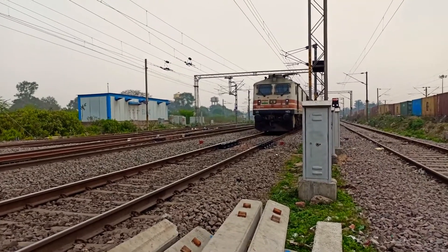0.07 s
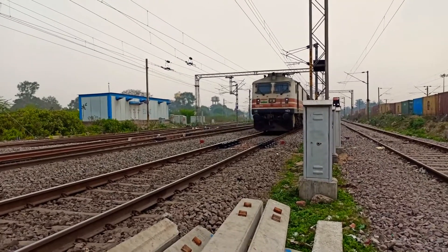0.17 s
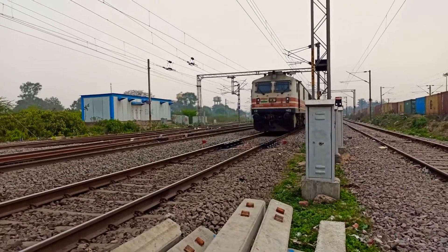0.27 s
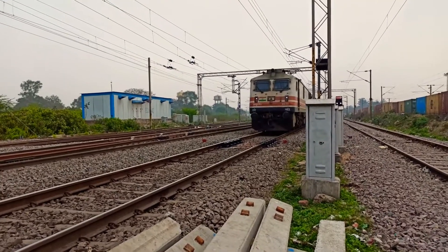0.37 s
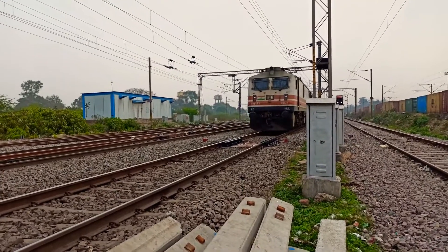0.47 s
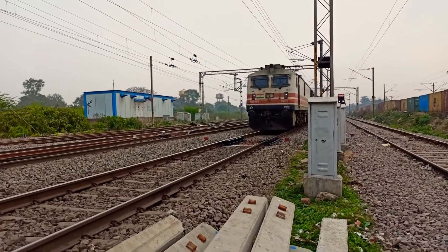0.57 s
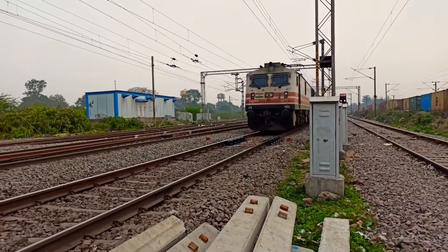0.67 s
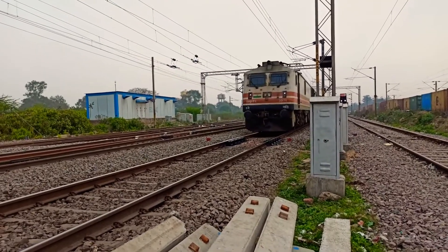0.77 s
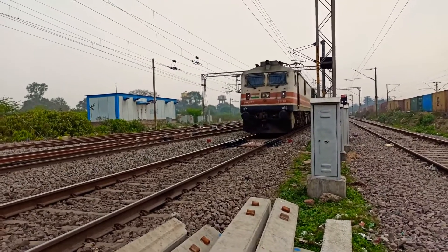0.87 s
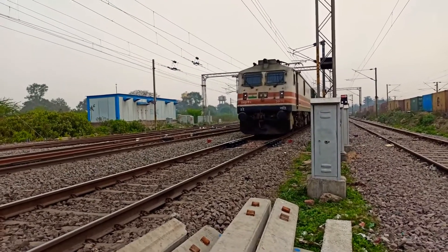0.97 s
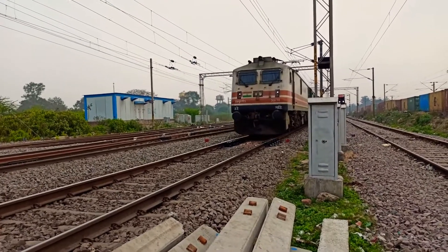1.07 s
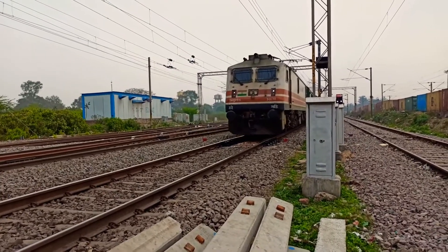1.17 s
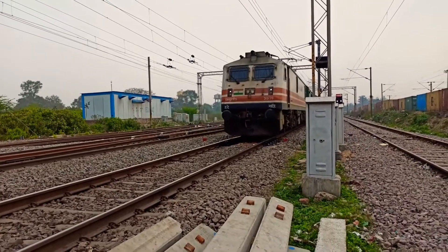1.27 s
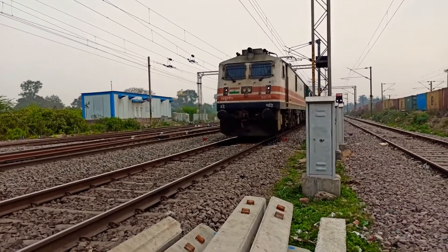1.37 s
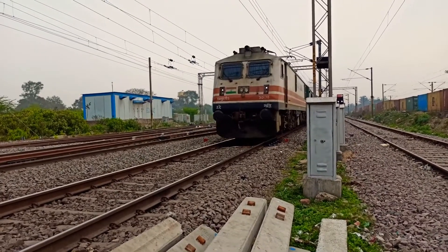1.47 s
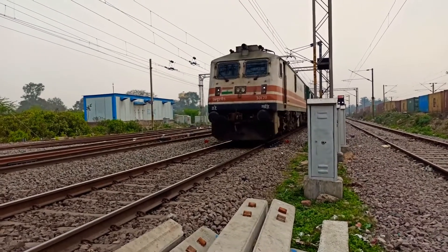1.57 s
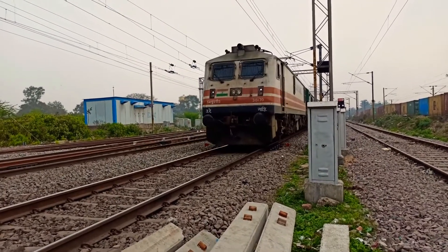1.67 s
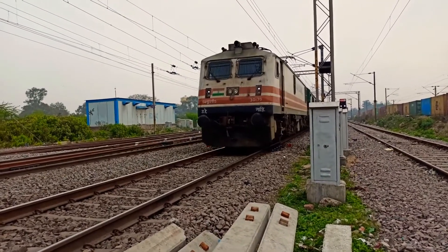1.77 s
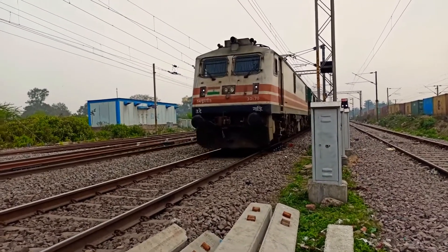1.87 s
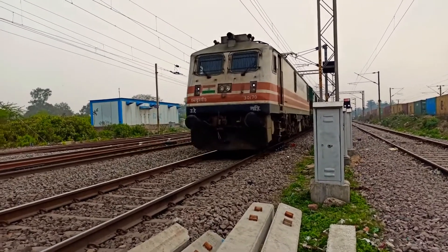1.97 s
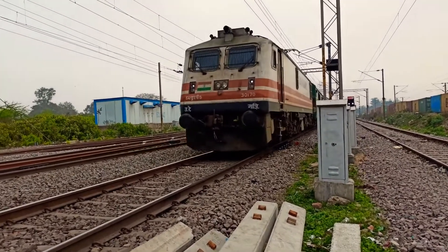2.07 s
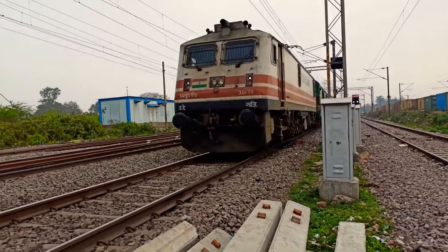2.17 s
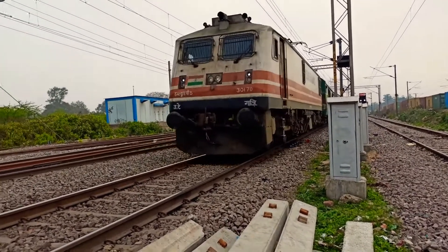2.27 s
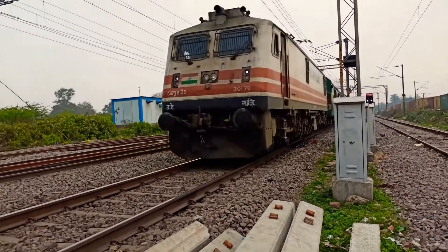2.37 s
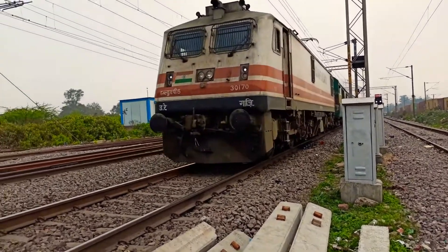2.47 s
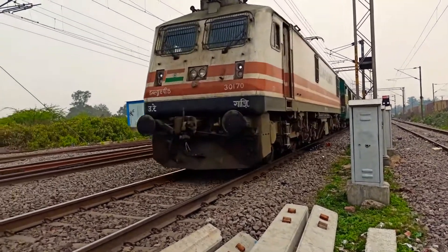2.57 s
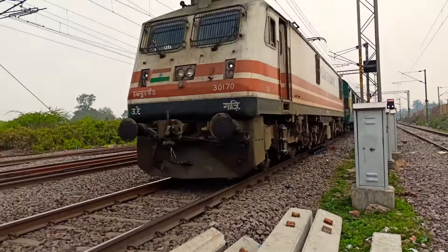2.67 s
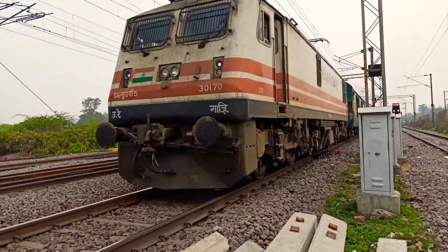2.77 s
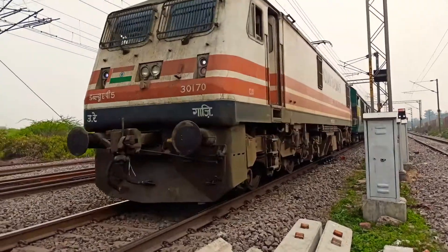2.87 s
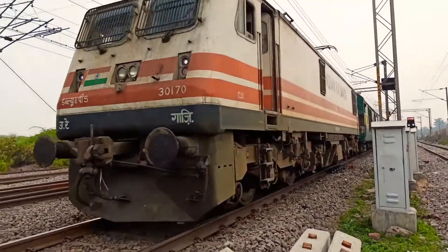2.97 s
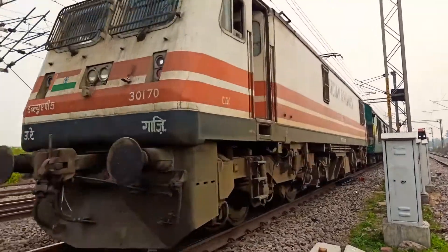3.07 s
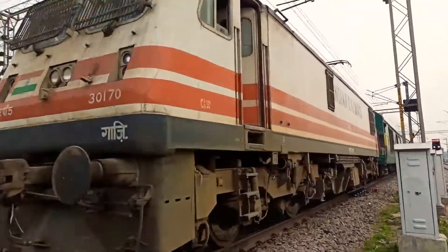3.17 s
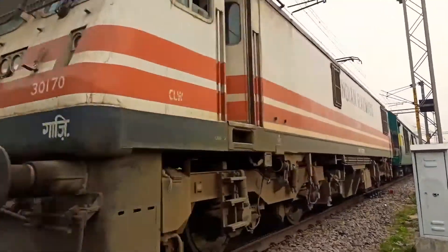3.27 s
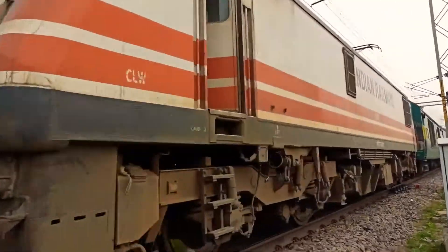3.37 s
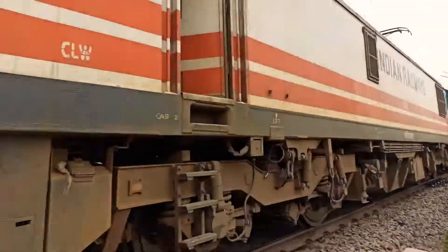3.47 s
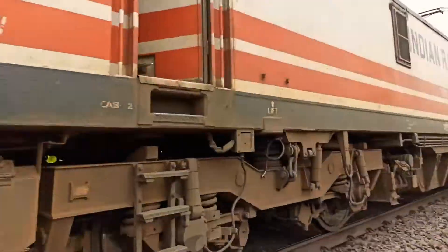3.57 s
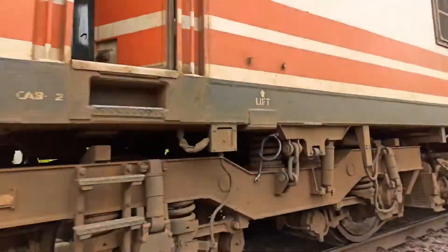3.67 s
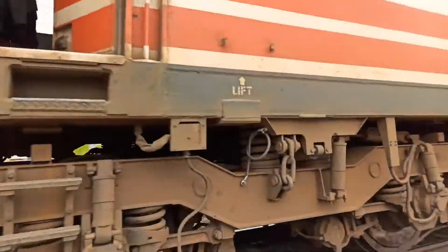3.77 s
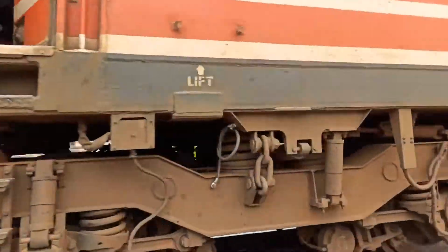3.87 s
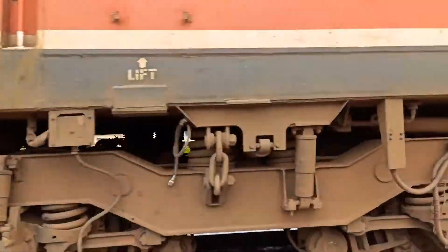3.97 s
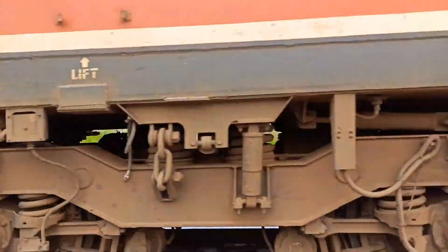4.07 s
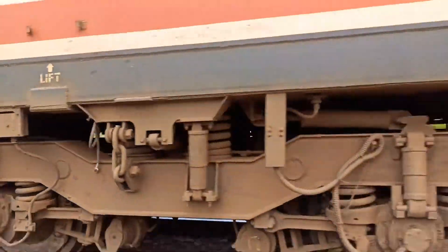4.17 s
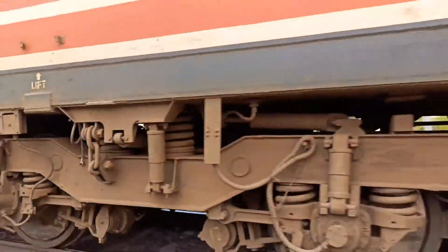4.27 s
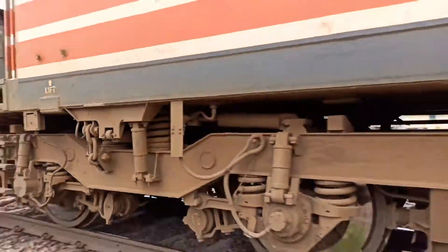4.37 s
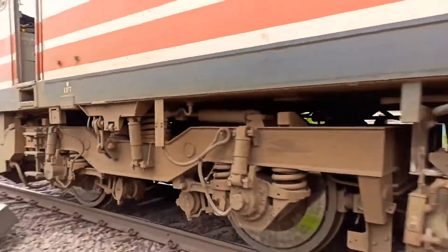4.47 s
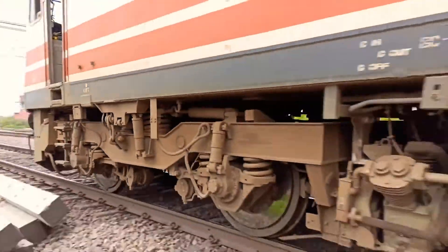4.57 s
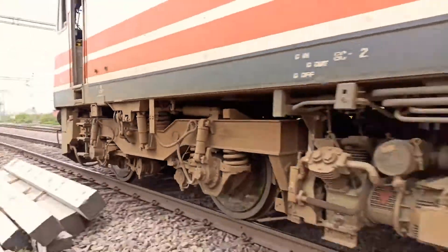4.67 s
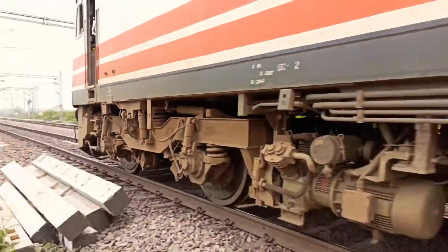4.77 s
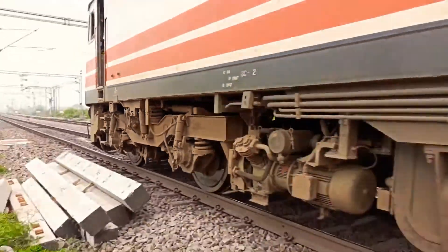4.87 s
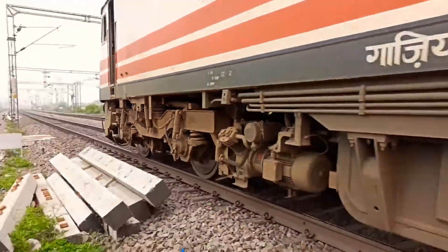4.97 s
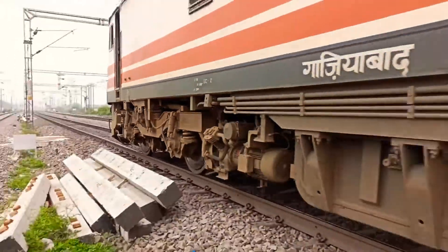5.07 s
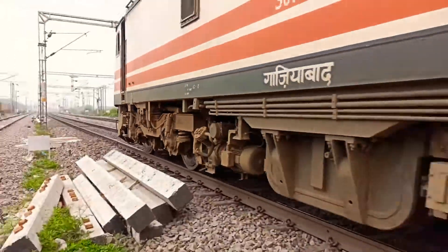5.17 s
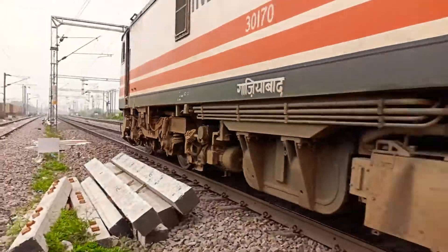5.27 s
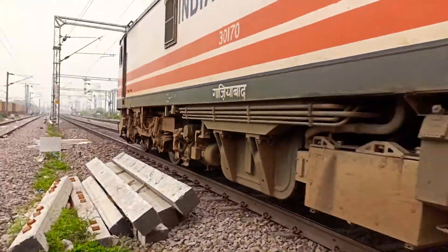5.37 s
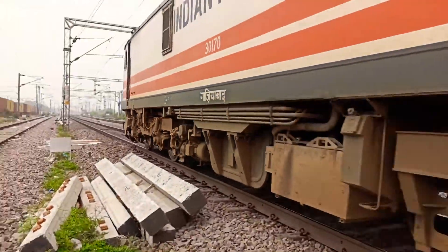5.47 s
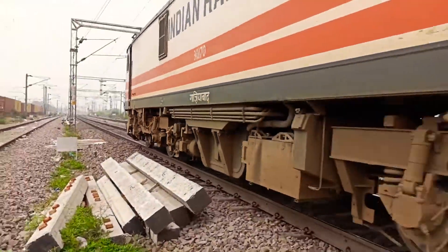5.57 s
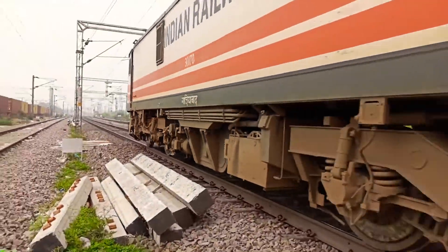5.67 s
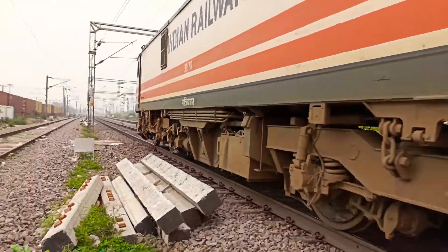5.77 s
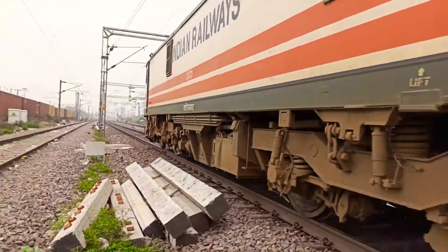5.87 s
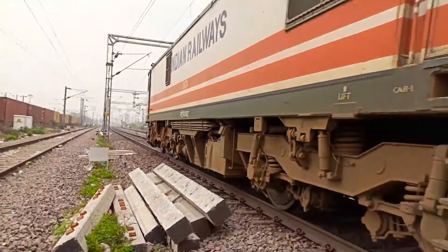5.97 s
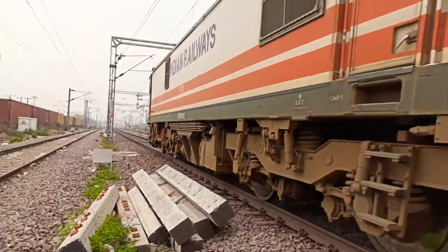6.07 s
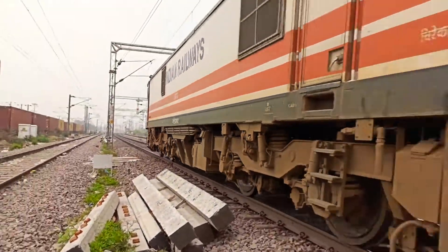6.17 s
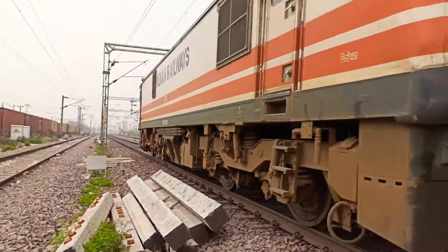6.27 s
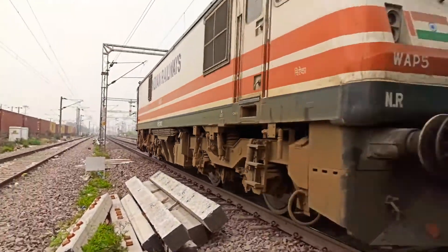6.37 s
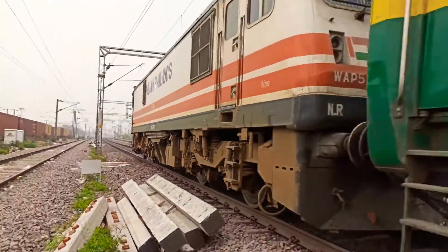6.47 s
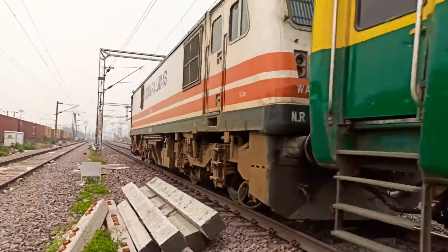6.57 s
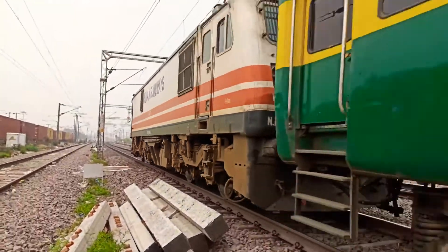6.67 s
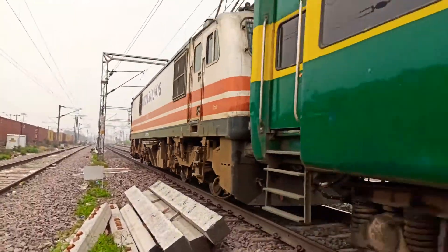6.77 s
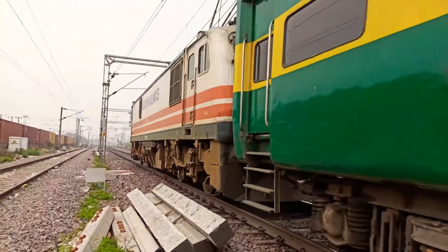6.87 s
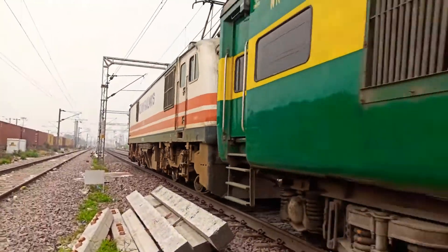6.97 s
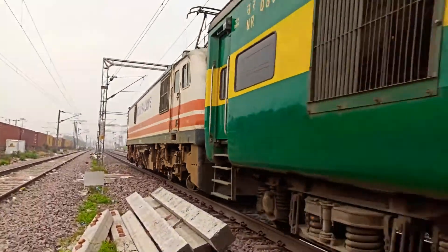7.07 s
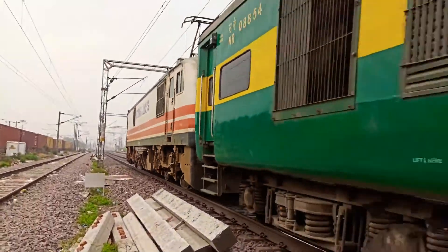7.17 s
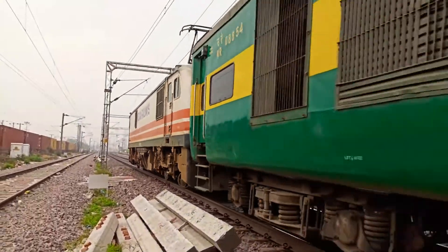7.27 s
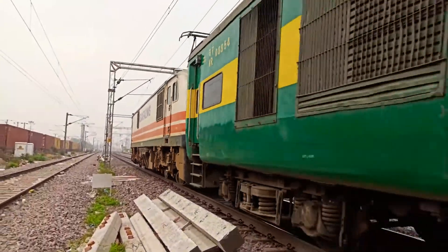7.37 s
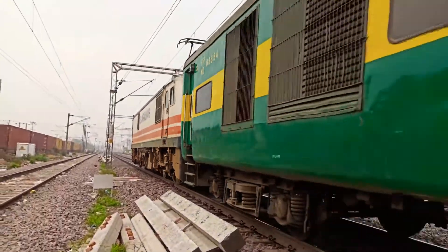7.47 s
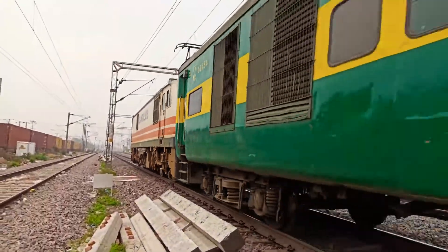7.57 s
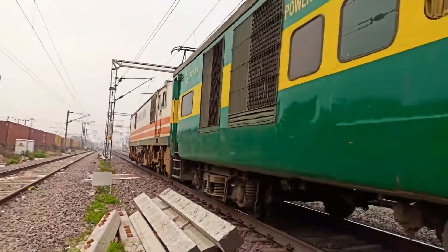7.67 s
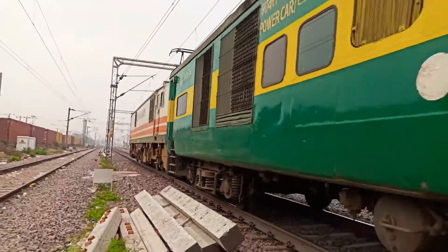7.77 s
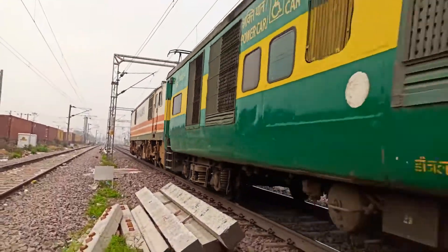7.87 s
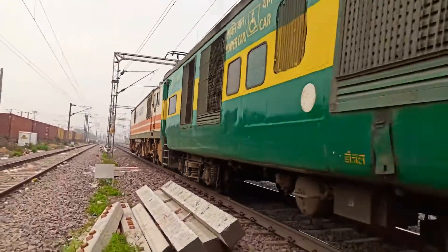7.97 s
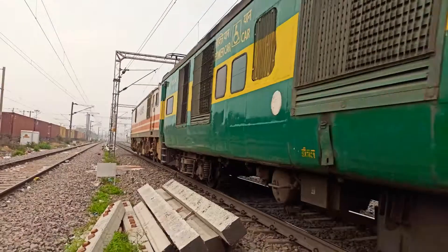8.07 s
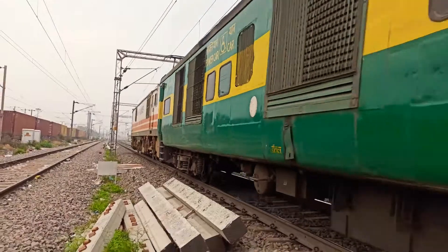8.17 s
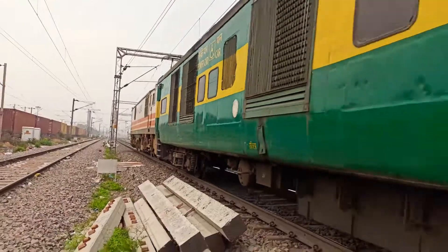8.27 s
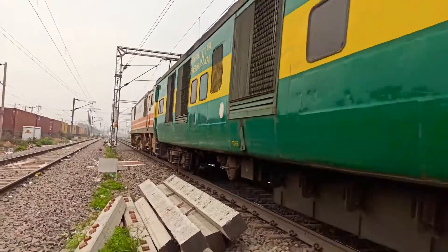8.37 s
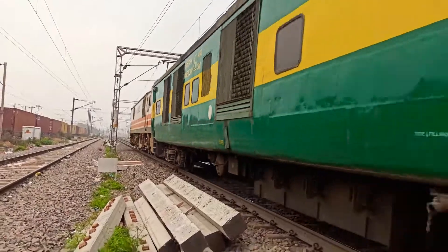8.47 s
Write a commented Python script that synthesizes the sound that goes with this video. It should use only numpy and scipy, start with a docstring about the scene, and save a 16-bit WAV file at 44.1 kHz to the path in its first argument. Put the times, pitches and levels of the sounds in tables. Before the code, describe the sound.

Rough, patchy wheel-on-rail noise grows from moderate to heavy as a train draws level a few metres away in the open. Under it a deep electric hum wavers. Wheel rims shriek in wandering high tones and flanges scrape in hissing bursts, loudest just after a quick cluster of metallic clanks. Loud treble briefly pushes the rest down; later, rumble and hum dominate.

```python
"""An electric locomotive and its first coach roll slowly past, a few metres from a pair of microphones.
From the start noise rumbles and roars like wheels on rail, under wavering motor hums; wheel rims squeal as
wandering tones and flanges scrape in bursts of hiss. Around two seconds axles knock over a joint, as
noise-struck damped modes; then come the loudest squeals and scrapes, and the motors whine more, as unsteady
tones. The last scrapes and squeals are weaker. Gain control ducks everything under loud treble throughout."""
import sys
import numpy as np
from scipy import signal
from scipy.fft import next_fast_len
from scipy.io import wavfile
from scipy.ndimage import uniform_filter1d

SR = 44100
rng = np.random.default_rng(int(sys.argv[2]) if len(sys.argv) > 2 else 0)


def how_loud(loudness_db):
    """Turn decibels into a plain amplitude multiplier (0 dB gives 1, 20 dB gives 10)."""
    steps = np.asarray(loudness_db, float) / 20
    return 10 ** steps


def wav_record(signal):
    """Record a signal, one row per channel, as 16-bit PCM in the file named by sys.argv[1]."""
    frames = np.transpose(np.atleast_2d(signal))
    bounded = np.clip(frames, -1, 1)
    # unit amplitude maps onto the largest positive 16-bit level
    quanta = np.round(bounded * 32767).astype(np.int16)
    wavfile.write(sys.argv[1], SR, quanta)


N = 375732  # length in samples

# likeness of left and right, from 0 to 1: f/Hz, likeness
LIKENESS = [(60, .8), (300, .9), (800, .65), (1500, .45), (4000, .4), (15000, .1)]
# the side of the sound shifts back and forth between the microphones: t/s, lag of left behind right/ms
LEFT_LAG = [(0, 0.19), (1.4, 0.26), (1.8, -0.234), (2.8, -0.32), (3.3, 0.22), (6.5, 0.376), (7.4, 0.093),
            (8.52, -0.049)]
# the train draws near, then bogies pass: t/s, rumble level at 250-1000 Hz/dB, roar level at 1400-3600 Hz/dB
ROLLING_LEVELS = [(0, -28, -36.5), (.8, -27.5, -36.5), (1.3, -23.5, -32.5), (1.9, -23, -33),
                  (3.1, -23, -34.5), (3.25, -15.5, -27), (3.37, -19, -31.5), (3.44, -20.5, -31.5),
                  (4, -17.5, -25), (4.45, -17.5, -29), (5.2, -16, -27.5), (6.3, -16, -29.5),
                  (6.8, -13, -26.5), (7.34, -17, -28.5), (8.5, -16.5, -29)]


def read(points, hz):
    """Value of a spectrum at the given frequencies, joined along log frequency."""
    f, value = np.transpose(points)
    return np.interp(np.log(hz + 1), np.log(f + 1), value)


def follow(rows, t=None):
    """Every column of a curve, at the times t or else one value a sample."""
    s, *columns = np.transpose(rows)
    if t is None:
        t = np.arange(N) / SR
    return [np.interp(t, s, column) for column in columns]


def evened(x):
    """Scales to rms 1."""
    return x / np.sqrt(np.mean(abs(x) ** 2))


def wide_noise(spectrum, band_hz, patchy_db, flicker_db, size=12):
    """Stereo noise with drifting patches and flicker; the mean of both sides has rms 1 in band_hz."""
    frames, hz = N // 256 + 5, np.fft.rfftfreq(1024, 1 / SR)[:, None]
    a, b, c, d, patches = rng.standard_normal((frames, 513, 5), np.float32).T
    patches = uniform_filter1d(patches, size=10, axis=0)  # smooth along frequency
    patches = evened(uniform_filter1d(patches, size=size, axis=1))  # and along time
    flicker = evened(uniform_filter1d(rng.standard_normal(frames), size=3))

    lag_s = follow(LEFT_LAG, np.arange(frames) * 256 / SR)[0] / 1000
    same = np.clip(read(LIKENESS, hz), 0, 1)
    right = a + 1j * b
    shared = same * right * np.exp(-2j * np.pi * hz * lag_s)
    left = shared + np.sqrt(1 - same ** 2) * (c + 1j * d)
    z = np.array([left, right]) * how_loud(read(spectrum, hz) + patchy_db * patches + flicker_db * flicker)
    x = signal.istft(z.astype(np.complex64), nperseg=1024, noverlap=768)[1][:, :N]

    power = abs(z.mean(0)) ** 2
    in_band = (hz[:, 0] > band_hz[0]) & (hz[:, 0] < band_hz[1])
    share = power[in_band].sum() / power.sum()
    return x / np.sqrt(np.mean(x.mean(0) ** 2) * share)


def whistle(t, hz, width, steady, skirt=1):
    """A complex tone wandering in size and phase within width (Hz); steady adds a clean core, low skirt a halo."""
    step = 32  # samples between points of the slow wander
    size = next_fast_len(len(hz) // step + 2)
    a, b, c, d = rng.standard_normal((size, 4)).T
    same = np.clip(read(LIKENESS, hz[0]), 0, 1)
    left = a + 1j * b
    right = same * left + np.sqrt(1 - same ** 2) * (c + 1j * d)
    off_hz = np.fft.fftfreq(size, step / SR)
    wander = np.fft.ifft(np.array([left, right]) / (1 + (2 * off_hz / width) ** 2) ** skirt)
    slow = np.sqrt(2) * evened(steady + evened(wander))  # the real part then has rms near 1

    lag_s = follow(LEFT_LAG, t[0] + np.arange(size) * step / SR)[0] / 1000
    slow[0] *= np.exp(-2j * np.pi * hz[0] * lag_s)
    at = np.arange(len(hz)) / step
    envelope = np.array([np.interp(at, np.arange(size), side) for side in slow])
    return envelope * np.exp(2j * np.pi * np.cumsum(hz) / SR)


def bursts(table, shift, steady, rise_s, fade_db_per_s, flutter_db, skirt):
    """Each stretch of tone rises, flutters along its slope, then dies away; the curve shift scales the pitch."""
    out = np.zeros((2, N), complex)
    tail_s = 25 / fade_db_per_s  # time to fall 25 dB
    for hz, width, stretches in table:
        for start, end, first_db, last_db in stretches:
            at = np.arange(round(start * SR), min(round((end + tail_s) * SR), N))
            t = at / SR
            db = np.interp(t, [start, end, end + tail_s], [first_db, last_db, last_db - 25])
            flutter = np.interp(t, t[::1500], rng.standard_normal(len(t[::1500])))
            level = how_loud(db + flutter_db * flutter) * np.minimum((t - start) / rise_s, 1)
            out[:, at] += level * whistle(t, hz * follow(shift, t)[0], width, steady, skirt)
    return out


def rolling():
    """Rough wheels on rail: low rumble and middle roar, both patchy, flickering noise."""
    # colour of the rumble: f/Hz, relative density per Hz/dB
    rumble_colour = [(30, -53), (55, -50), (100, -8.5), (170, -2.5), (350, -4), (600, -8), (950, -11.5),
                     (1150, -40), (2500, -57.5)]
    # colour of the roar: f/Hz, relative density per Hz/dB
    roar_colour = [(600, -35.5), (1100, 5), (1700, 0.5), (4000, -1.5), (4700, -5.5), (5000, -13),
                   (8500, -15), (15500, -71)]
    rumble_db, roar_db = follow(ROLLING_LEVELS)
    rumble = wide_noise(rumble_colour, (250, 1000), patchy_db=1.5, flicker_db=1.0, size=4)
    roar = wide_noise(roar_colour, (1400, 3600), patchy_db=1.5, flicker_db=0.55)
    return how_loud(rumble_db) * rumble + how_loud(roar_db) * roar


def motors():
    """Two motors about 1 Hz apart beat in a low hum with its octave; motors and gears whine unsteadily."""
    # levels of the first motor: t/s, hum level/dB, octave level/dB
    hum_levels = [(0, -23, -30.5), (.8, -26, -29.5), (1.8, -27, -28.5), (2.6, -26, -37.5),
                  (3.6, -28.5, -25.5), (4.6, -21.5, -28), (5.9, -26.5, -29), (7, -23, -20.5),
                  (8.5, -23.5, -27)]
    # pitch of the hum: t/s, f/Hz
    hum_pitch = [(0, 76.5), (2, 77.6), (6.4, 78.3), (7.3, 75.3), (8.52, 74.1)]
    # moments at which the two hums cancel most: t/s
    beats = [-.75, .24, 1.28, 2.25, 3.1, 4.2, 5.5, 6.48, 7.6, 8.3, 9.1]
    # motor and gear whines: f before the speed factor/Hz, width/Hz,
    # stretches as (start t/s, end t/s, first level/dB, last level/dB)
    whine_tones = [ (206.5, 4.7, [(3, 3.35, -20.5, -33.5), (5.7, 8.52, -17.5, -23)]),
                   (223.9, 9.8, [(3.5, 4.15, -15.5, -28.5), (4.15, 5.9, -16, -21.5)]),
                   (274, 7.3, [(2.9, 4.7, -21.5, -24)]), (328.8, 45, [(.3, 1.9, -33.5, -28),
                   (6.4, 8.3, -20.5, -22)]), (607, 14, [(2.4, 3.4, -31.5, -32.5), (3.65, 4.2, -23, -21.5),
                   (4.3, 5.5, -30, -27)]), (1209, 17, [(1.93, 3.37, -33.5, -28.5),
                   (3.5, 4.35, -25.5, -23.5), (4.4, 4.75, -30, -26)]),
                   (2010, 40, [(3.65, 4.13, -25, -20.5)]), ]
    # motor speed as heard, sinking while the motors pass: t/s, factor on the whines
    motor_speed = [(3.2, 1.012), (4.8, .983), (8.52, .955)]

    t = np.arange(N) / SR
    hum_db, octave_db = follow(hum_levels)
    apart = np.exp(2j * np.pi * np.interp(t, beats, np.arange(len(beats))))  # one turn a beat
    tone = whistle(t, follow(hum_pitch)[0], 6.9, steady=4.6)
    hum = how_loud(hum_db) * (1 - 0.7 * apart) * tone  # the second motor is 0.7 of the first
    octave = how_loud(octave_db) * (1 - 0.15 * apart ** 2) * tone ** 2 / np.sqrt(2)
    whines = bursts(whine_tones, motor_speed, steady=1.2, rise_s=0.047, fade_db_per_s=150,
                    flutter_db=2.0, skirt=1)
    return (hum + octave + whines).real


def knocks():
    """Each axle clanks the joint: a dying rattle of noise rings damped steel, with a low thud."""
    # wheels over the joint: t/s, clank peak level/dB, thud peak level/dB
    axles = [(1.7193, -3, -9.5), (1.847, -3.5, -17), (1.8956, -2, -24), (2.015, -7, -26),
             (2.1287, -3.5, -4.5)]
    # modes of the struck steel: f/Hz, relative level/dB, time to fall 60 dB/s
    steel_modes = [(836, -2, 0.021), (2150, -17, 0.019), (4150, -2, 0.0047), (6410, -1, 0.011),
                   (7300, -15, 0.0083)]
    t, out = np.arange(4000) / SR, np.zeros((2, N))
    low = signal.butter(N=2, Wn=1100, fs=SR)
    for s, clank_db, thud_db in axles:
        balance_db = rng.uniform(-4, 4, len(steel_modes))  # each axle rings the modes in its own balance
        steel = np.zeros(len(t))
        for (hz, db, t60), extra_db in zip(steel_modes, balance_db):
            steel += how_loud(db + extra_db - 60 * t / t60) * np.sin(2 * np.pi * hz * t)
        steel[0] = 3.0  # the bare crack
        rattle = rng.standard_normal((2, len(t))) * how_loud(-60 * t / .05) * np.minimum(t / .002, 1)
        clank = signal.fftconvolve(rattle, steel[None], axes=1)[:, :len(t)]
        thud = signal.lfilter(*low, rng.standard_normal(len(t)))
        thud = thud * how_loud(-60 * t / 0.18) * np.minimum(t / 0.0026, 1)
        at = round(s * SR) - 100  # starts early to leave room for the rise
        out[:, at:at + len(t)] += how_loud(clank_db) * clank / abs(clank).max()
        out[:, at:at + len(t)] += how_loud(thud_db) * thud / abs(thud).max()
    return out


def scrapes():
    """Flanges bearing against the rail hiss in bursts over a light contact hiss, a little to the right."""
    # flange contacts, hiss levels at 7100-7900 Hz:
    # start t/s, let-go t/s, first level/dB, level at let-go/dB, fade time/s
    contacts = [(0.436, 0.74, -38, -39, 0.14), (1.036, 1.256, -34, -36.5, 0.44),
                (2.02, 2.702, -24.5, -21.5, .1), (2.706, 3.124, -20, -22, 0.25),
                (3.348, 4.128, -23.5, -24.5, .03), (4.671, 5.183, -21.5, -25.5, .1),
                (5.25, 5.454, -34, -34, .15), (6.284, 6.45, -27, -26.5, .35), (7.55, 7.9, -36.5, -33, 0.53)]
    # spectrum of the hiss as finally heard, with a gap at 8.9-11.3 kHz that is not the flange's own:
    # f/Hz, relative density per Hz/dB
    hiss_spectrum = [(2500, -17.5), (4200, -5.5), (5000, -9), (6200, -3), (7500, 2), (8600, -6),
                     (8900, -25), (11300, -26.5), (11600, -10), (13000, -14), (15500, -9.5)]
    roar_db = follow(ROLLING_LEVELS)[1]
    contact = how_loud(roar_db - 9)  # light contact keeps 9 dB under the roar
    for start, end, first_db, last_db, fade_s in contacts:
        at = np.arange(round(start * SR), round((end + fade_s) * SR))
        db = np.interp(at / SR, [start, end, end + fade_s], [first_db, last_db, last_db - 18])
        contact[at] = np.maximum(contact[at], how_loud(db))
    contact = uniform_filter1d(contact, round(0.019 * SR))  # softens the edges over 19 ms
    hiss = contact * wide_noise(hiss_spectrum, (7100, 7900), patchy_db=2.5, flicker_db=1.5, size=3)
    return hiss * how_loud(np.array([[-.7], [.7]]))


def squeal():
    """Stick-slip sounds ring modes unevenly; the slip is not a sine, so doubles and sums of modes appear."""
    # ring modes of the wheels: f before the Doppler factor/Hz, width/Hz,
    # squeals as (start t/s, let-go t/s, first level/dB, level at let-go/dB)
    ring_modes = [ (3190, 200, [(7.8, 8.5, -33.5, -30)]), (3878, 68, [(0, .3, -29, -46),
                  (.93, 1.1, -26, -33), (2.7, 3.2, -14.5, -14.5), (3.63, 3.95, -24, -24)]),
                  (4430, 290, [(2.66, 3.05, -15, -21.5)]), (4700, 56, [(.44, .6, -37, -38)]),
                  (5245, 70, [(2.33, 2.62, -13, -5), (3.42, 3.72, -24, -28)]),
                  (6220, 500, [(2.19, 2.75, -1.5, -30.5), (4.655, 4.7, -14, -17)]),
                  (6697, 120, [(.55, .64, -29, -11.5), (.64, .8, -17, -21), (.8, 1.1, -25.5, -28),
                  (1.11, 1.2, -12, -13), (1.18, 1.63, -10.5, -12), (2.02, 2.5, -23, -11.5),
                  (3.37, 3.56, -8, -16.5), (3.68, 4.02, -23, -12), (4.74, 5.25, -10.5, -32),
                  (6.29, 6.58, -22, -25), (6.84, 7.3, -23.5, -29.5)]), (7680, 90, [(2.4, 3.1, -26, -31),
                  (4.7, 5.2, -24, -39)]), (8145, 60, [(.85, 1.15, -38, -35), (2.012, 2.18, -2.5, -2.5),
                  (2.73, 3.2, -8, -18.5), (5.32, 5.5, -15, -26), (7.57, 7.9, -25.5, -26.5)]), ]
    # approach raises the squeals, departure lowers them: t/s, factor on pitch
    doppler = [(2.5, 1.003), (5.5, .996)]
    rims = bursts(ring_modes, doppler, steady=0.26, rise_s=0.033, fade_db_per_s=131.5,
                  flutter_db=2.0, skirt=0.7)
    return (rims + how_loud(-18) * rims ** 2).real


def scene():
    """All sources together."""
    return rolling() + motors() + knocks() + scrapes() + squeal()


def band_limit(x):
    """A steep low-pass at the top of the band."""
    return signal.sosfilt(signal.butter(12, 16000, fs=SR, output="sos"), x)


def record(dry):
    """Gain control senses the treble and turns everything down when it is loud; peaks are softly limited."""
    sense_hz, sense_s, knee_db, duck_slope = 7300, 0.03, -24.5, 0.47  # slope: dB down per dB over the knee
    treble = signal.lfilter(*signal.butter(N=4, Wn=sense_hz, btype="high", fs=SR), dry.mean(0))
    keep = np.exp(-1 / (sense_s * SR))
    treble_power = signal.lfilter([1 - keep], [1, -keep], treble ** 2)
    treble_db = 10 * np.log10(treble_power + 1e-12)
    ducked = dry * how_loud(-duck_slope * np.maximum(treble_db - knee_db, 0))
    limited = 1.275 * np.tanh(ducked / 1.33)
    return band_limit(limited)


dry = scene()
out = record(dry)
wav_record(out)
```